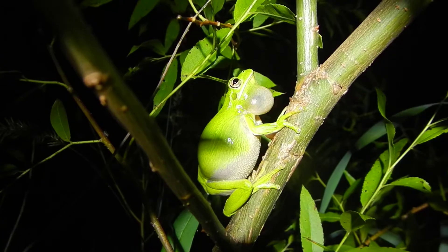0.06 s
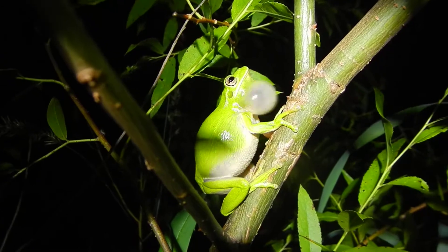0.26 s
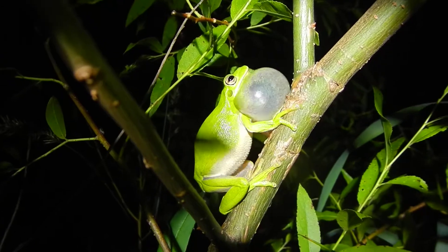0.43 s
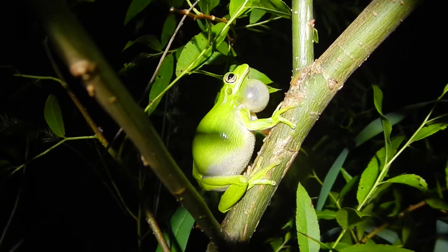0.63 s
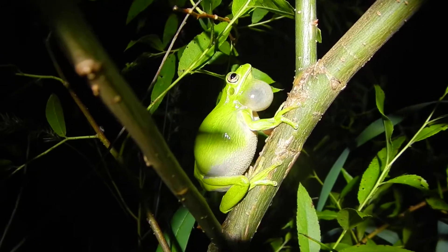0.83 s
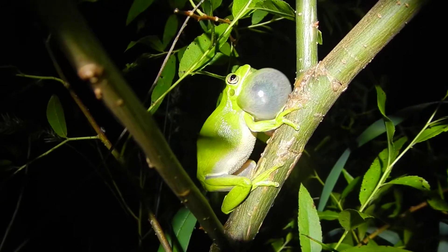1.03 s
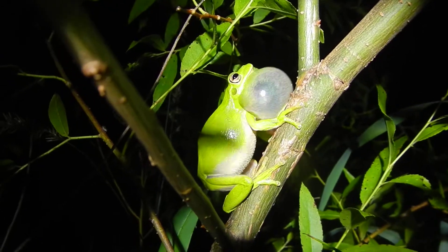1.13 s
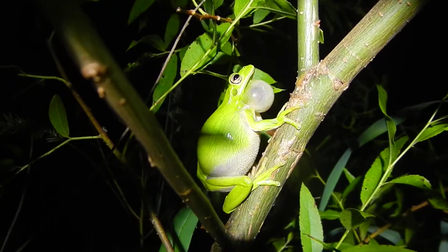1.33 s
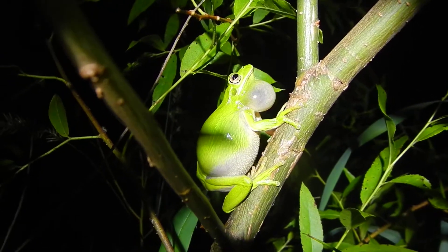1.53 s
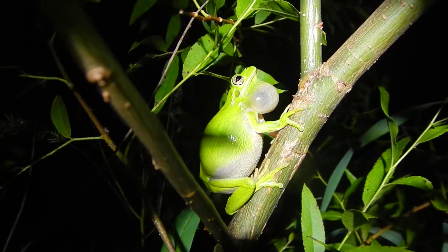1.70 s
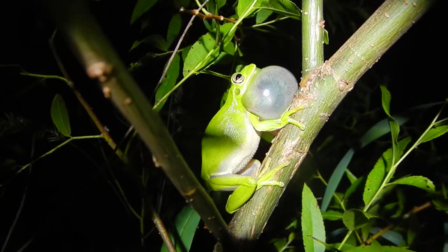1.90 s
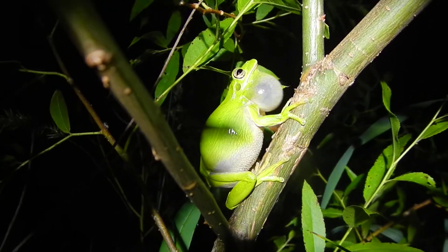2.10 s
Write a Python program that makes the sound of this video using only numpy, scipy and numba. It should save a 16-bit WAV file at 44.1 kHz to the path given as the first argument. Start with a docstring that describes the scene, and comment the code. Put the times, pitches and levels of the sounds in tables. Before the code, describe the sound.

A tree frog on a nearby branch gives three loud, short, nasal croaks at fairly even intervals. Between them, fainter frogs answer from farther off over a low rattling chorus in a wetland at night.

```python
"""A wetland at night, with a distant chorus of rattling frogs.
At 0.25 s a tree frog croaks from a branch close by: a few pops, an even pulse train through
the throat and the swelling vocal sac, then slackening pulses and a falling squeak.
The background dips at each near croak and creeps back, like a recorder's automatic gain.
From 0.46 s other tree frogs answer from farther off; the near one croaks again at 0.92 and 1.76 s."""
import sys
import numpy as np
from scipy import signal
from scipy.fft import rfft, irfft, next_fast_len
from scipy.io import wavfile
from scipy.ndimage import uniform_filter1d, minimum_filter1d
from numba import njit

SR = 44100
rng = np.random.default_rng(int(sys.argv[2]) if len(sys.argv) > 2 else 0)


def int16_out(signal):
    """Quantize to a 16-bit WAV file."""
    q = np.round(np.clip(np.atleast_2d(signal).T, -1, 1) * 32767)
    wavfile.write(sys.argv[1], SR, q.astype(np.int16))


N = 94815
TIME = np.arange(N) / SR

# near croaks: main_pop_s, slack_after_s, level_db, pitch_hz, lead_in_db
NEAR_CROAKS = [(0.2485, 0.12, -3, 271.4, -1.5), (.9185, 0.12, -3.4, 271.7, -23.5),
               (1.7591, 0.12, -4.26, 271.2, -20.5)]


def near_frog():
    """Pops, pulse train, slack pulses and squeak, all through the same throat."""
    # opening pops: after_main_pop_s, level_db
    opening_pops = [(0, 0.5), (0.0127, -3.5), (0.0187, 6.5)]
    # voice colour: freq_hz, gain_db
    near_eq = [(100, -9.5), (270, -11.5), (520, -16), (760, -2.5), (1100, 14), (1700, 4.5), (2900, 2),
               (3500, -5), (4300, -10), (5200, -4), (5900, -10), (7100, -18.5), (8200, -34.5), (9200, -26),
               (10300, -28.5), (13300, -31.5), (16000, -33)]
    # direction: freq_hz, left_minus_right_db
    balance = [(800, -2.1), (1500, 0), (2800, -4), (4500, -1.5), (6000, -8), (9000, 4.5)]
    lead_in_s, squeak_after_s, rasp_db, scatter_db = .0105, .023, -38, -28
    voice = 0
    for start_s, slack_after_s, level_db, pitch_hz, lead_in_db in NEAR_CROAKS:
        slack_s = start_s + slack_after_s
        train = pulse_train(start_s, slack_after_s, pitch_hz)
        soft = squeak(slack_s + squeak_after_s) + pop(start_s - lead_in_s, lead_in_db)
        soft += sum(pop(start_s + after_s, db) for after_s, db in opening_pops)
        source = train + slack(slack_s) + lowpass(soft, 4300)
        rasp_envelope = signal.lfilter([1], [1, -.96], np.abs(source) + 1e-18)
        source += from_db(rasp_db) * rasp_envelope * rng.standard_normal(N)
        croak = throat(source, start_s, low_hz=764, low_db=20.5, sac_hz=3010)
        voice += from_db(level_db) * (croak + overtones(source, start_s))
    voice = colour(voice, near_eq)
    ears = np.array([colour(voice, [(hz, side * db / 2) for hz, db in balance]) for side in (1, -1)])
    return ears + from_db(scatter_db) * foliage(voice)


def pop(end_s, peak_db, swing_hz=902.5, growth_db=3):
    """Four growing swings of the cords that stop at once."""
    swings_left = np.arange(4)
    times_s = end_s - swings_left / swing_hz * rng.uniform(.84, 1.08)
    return pulses(times_s, peak_db - growth_db * swings_left)


def pulse_train(main_pop_s, slack_after_s, pitch_hz):
    """The cords beat evenly, starting a little sharp and settling on pitch."""
    # pulse strength: after_main_pop_s, level_db
    effort = [(.026, 3.5), (.045, 0.5), (.1, -0.5), (.125, -2.5)]
    delay_s, sharp_hz, settle_s, jitter_periods = .0262, 9, .03, .003
    rate_hz = pitch_hz + sharp_hz * np.exp(-TIME / settle_s)
    times_s = cycle_times(main_pop_s + delay_s, slack_after_s - delay_s - .5 / pitch_hz, rate_hz)
    times_s += jitter_periods / pitch_hz * rng.standard_normal(N)[:len(times_s)]
    return pulses(times_s, curve(effort, times_s - main_pop_s))


def slack(start_s, count=5, rate_hz=200.9, loss_db=3, pair_gap_s=.001004):
    """As the pressure drops the pulses come slower, in fading weak-strong pairs."""
    pair = np.arange(count)
    times_s = start_s + pair / rate_hz + rng.normal(0, .00008, count)
    level_db = -1.5 - loss_db * pair + rng.normal(0, 1, count)
    return pulses(times_s, level_db - 3.5) + pulses(times_s + pair_gap_s, level_db)


def squeak(start_s, length_s=.023, top_hz=857, fall_hz=340, fade_db=29.5):
    """The cords ring on freely, falling in pitch as they fade."""
    pitch_hz = top_hz - fall_hz * np.minimum(TIME / length_s, 1) ** 2
    times_s = cycle_times(start_s, length_s, pitch_hz)
    return pulses(times_s, -10 - fade_db * (times_s - start_s) / length_s)


def throat(source, start_s, low_hz, low_db, sac_hz):
    """A fixed low resonance and two upper ones that rise as the vocal sac fills."""
    rise_hz, rise_s, mid_ratio = 900, .043, .76
    age_s = np.maximum(TIME - start_s, 0)
    upper_hz = sac_hz - rise_hz * np.exp(-age_s / rise_s)
    small_sac_db = 9.5 * np.exp(-age_s / .044)
    low = resonate(source * from_db(low_db + small_sac_db), low_hz, width_hz=100)
    mid = from_db(11) * glide(source, mid_ratio * upper_hz, width_hz=340)
    sac = from_db(26) * glide(source, upper_hz, width_hz=250)
    return low + mid + sac


def overtones(source, start_s, flicker_db=4, waver_ratio=.025):
    """High throat resonances ring between the pulses, drifting and wavering."""
    # throat modes: start_hz, glide_hz_per_s, width_hz, level_db
    modes = [(3710, -17.5, 600, 10), (4480, -1000, 120, 12), (5634, 1488, 190, 14), (6704, 1003, 290, 11.5),
             (7970, -1500, 160, 17), (9150, -3000, 87, 11), (12046, -9000, 300, 8),
             (14090, -16000, 440, 7.5)]
    age_s = np.clip(TIME - start_s, 0, .2)
    ring = 0
    for start_hz, glide_hz_per_s, width_hz, level_db in modes:
        gain = from_db(level_db + flicker_db * wander())
        centre_hz = (start_hz + glide_hz_per_s * age_s) * (1 + waver_ratio * wander())
        ring += gain * glide(source, centre_hz, width_hz)
    return ring


def thumps(decay_s=.027, cutoff_hz=265):
    """A faint dull thump under the opening pops, stronger with a louder lead-in."""
    envelope = sum(from_db(.5 * lead_in_db) * (TIME > start_s) * np.exp(-np.abs(TIME - start_s) / decay_s)
                   for start_s, *_, lead_in_db in NEAR_CROAKS)
    return from_db(-34.5) * envelope * rms_one(lowpass(wide_noise(), cutoff_hz))


def far_frogs():
    """Answering croaks: soft-edged pulse trains through the throat, scattered by foliage."""
    # answers: start_s, length_s, pitch_hz, level_db, low_hz, sac_hz, roughness (0-1)
    answers = [(.46, 0.18, 286, -29, 960, 3390, 0.07), (0.671, 0.18, 193, -25, 1016, 3180, 0.1),
               (1.125, .165, 281.1, -33, 950, 3100, 0.03), (1.305, 0.19, 286.8, -29.5, 950, 3390, .06),
               (1.59, 0.18, 277, -35, 820, 2987, 0.13), (1.944, 0.1806, 195.5, -29.5, 1040, 3210, .15),
               (1.97, 0.19, 285.3, -37, 830, 3060, 0.08)]
    # voice colour: freq_hz, gain_db
    far_eq = [(300, -21), (650, -23.5), (880, -3.5), (1800, 0.5), (3000, -2.5), (4000, -11), (5000, -8.5),
              (6200, -19.5), (7400, -3.5), (8600, -27.5), (11000, -36), (16000, -54)]
    attack_s, release_s, sag_ratio, scatter_db = .0503, .047, .0219, -7
    voice = 0
    for start_s, length_s, pitch_hz, level_db, low_hz, sac_hz, roughness in answers:
        rate_hz = pitch_hz * (1 + sag_ratio * np.exp(-2 * TIME / length_s))
        times_s = cycle_times(start_s, length_s, rate_hz)
        jitter, shimmer = roughness * rng.standard_normal((200, 2))[:len(times_s)].T
        source = pulses(times_s + .12 / pitch_hz * jitter, level_db + 10 * shimmer)
        attack = np.clip((TIME - start_s) / attack_s, 0, 1)
        release = np.clip((start_s + length_s - TIME) / release_s, 0, 1)
        voice += throat(source * attack * release, start_s, low_hz, low_db=22, sac_hz=sac_hz)
    voice = colour(voice, far_eq)
    return voice + from_db(scatter_db) * foliage(voice)


def chorus(whine_hz=14835):
    """Rattles, ticks and a thin whine over a blur of frogs, ducked at each near croak."""
    # blur of the farthest frogs and night air: freq_hz, gain_db
    murmur_eq = [(25, -33), (60, -14), (88, -8), (140, -13), (300, -16), (750, -17), (1000, -9.5),
                 (1350, 2), (1850, -18), (2500, 4), (3300, -17), (4100, -6), (5200, -31), (8000, -34),
                 (11000, -36.5), (16000, -54.5)]
    # dips and slow recoveries, like a recorder's automatic gain: time_s, gain_db
    gain_ducking = [(0, -4), (.23, 0.5), (.42, -20), (.5, -13.5), (.66, -12), (.89, -9), (1.1, -16.5),
                    (1.25, -12), (1.5, -8.5), (1.73, -4), (1.94, -19), (2.04, -11), (2.15, -19)]
    murmur = from_db(-41) * rms_one(colour(wide_noise(), murmur_eq))
    whine = from_db(-68.5) * np.sin(2 * np.pi * whine_hz * TIME)
    return (murmur + rattles() + ticks() + whine) * from_db(curve(gain_ducking, TIME))


def rattles(sharpness=2.4):
    """Distant rattling frogs: evenly pulsed bands of noise."""
    # calls: first_pulse_s, end_s, rate_hz, centre_hz, width_hz, level_db
    calls = [(0.0187, 0.52, 49, 2514, 130, -38.5), (.015, 0.55, 40, 1337, 250, -44.5),
             (0.18, 1.5, 31, 2800, 880, -45.5), (0.4, 1.7, 71, 1340, 210, -45)]
    out = 0
    for first_s, end_s, rate_hz, centre_hz, width_hz, level_db in calls:
        gate = rms_one(np.exp(sharpness * np.cos(2 * np.pi * rate_hz * (TIME - first_s))))
        band = resonate(resonate(wide_noise(), centre_hz, width_hz), centre_hz, width_hz)
        running_rms = np.sqrt(uniform_filter1d(np.mean(band ** 2, axis=0), size=300) + 1e-20)
        calling = (TIME > first_s - .5 / rate_hz) * (TIME < end_s)
        out += from_db(level_db) * gate * calling * band / running_rms
    return out


def ticks(mean_per_s=30, centre_hz=3970, width_hz=310):
    """Random ringing ticks, scattered by foliage."""
    clicks = (rng.random(N) < mean_per_s / SR) * from_db(rng.normal(0, 5.9, N))
    ring = resonate(resonate(clicks, centre_hz, width_hz), centre_hz, width_hz)
    return from_db(-47) * rms_one(ring + 1.2 * foliage(ring))


def drone():
    """A faint steady low drone."""
    return from_db(-76.5) * rms_one(resonate(wide_noise(), centre_hz=84, width_hz=19))


def foliage(x, t60_s=.09):
    """Short diffuse scatter from leaves and water, different in each ear."""
    time_s = TIME[:SR // 4]
    tail = rng.standard_normal((2, len(time_s))) * from_db(-60 * time_s / t60_s) * (time_s > .002)
    return signal.fftconvolve(x[None], tail / np.sqrt(np.sum(tail[0] ** 2)), axes=1)[:, :N]


def cycle_times(start_s, length_s, rate_hz):
    """Pulse times of an oscillator; rate_hz runs from its start."""
    cycles = np.cumsum(rate_hz) / SR
    count = int(np.interp(length_s, TIME, cycles)) + 1
    return start_s + np.interp(np.arange(count), cycles, TIME)


def pulses(times_s, level_db):
    """Windowed-sinc pulses placed between samples."""
    out, position = np.zeros(N), times_s[:, None] * SR
    taps = np.floor(position).astype(int) + np.arange(-7, 9)
    offset = taps - position
    shape = np.sinc(offset) * np.sinc(offset / 8)
    np.add.at(out, np.clip(taps, 0, N - 1), shape * from_db(level_db)[:, None])
    return out


def resonate(x, centre_hz, width_hz):
    """Fixed resonance, unit peak gain."""
    radius = np.exp(-np.pi * width_hz / SR)
    zeros = np.array([1, 0, -1]) * (1 - radius ** 2) / 2
    poles = [1, -2 * radius * np.cos(2 * np.pi * centre_hz / SR), radius ** 2]
    denormal_guard = 1e-18 * (-1) ** (np.arange(N) // 2)
    return signal.lfilter(zeros, poles, x + denormal_guard)


@njit
def glide(x, centre_hz, width_hz):
    """Resonance with a moving centre."""
    radius = np.exp(-np.pi * width_hz / SR)
    out, state = np.zeros(len(x)), 0j
    for i in range(len(x)):
        state = state * radius * np.exp(2j * np.pi * centre_hz[i] / SR) + x[i] + 1e-18
        out[i] = (1 - radius) * (2 * state.real - x[i])
    return out


def colour(x, eq):
    """Minimum-phase filter through rows of freq_hz, gain_db."""
    size = 2 * next_fast_len(N // 2 + 4096)
    freq_hz, gain_db = np.transpose(eq)
    bin_hz = np.arange(size // 2 + 1) * SR / size
    bin_db = np.interp(np.log(bin_hz + 1), np.log(freq_hz), gain_db)
    cepstrum = irfft(np.log(from_db(bin_db)))
    cepstrum[1:size // 2] *= 2
    cepstrum[size // 2 + 1:] = 0
    return irfft(rfft(x, size) * np.exp(rfft(cepstrum)))[..., :N]


def lowpass(x, cutoff_hz):
    """Two-pole low-pass."""
    return signal.sosfilt(signal.butter(2, cutoff_hz, fs=SR, output="sos"), x + 1e-18)


def wide_noise(side_gain=.38):
    """Stereo noise, partly alike in both ears."""
    mid, side = rng.standard_normal((2, N))
    return mid + side_gain * side * np.array([[1], [-1]])


def wander(step_s=.03):
    """Straight lines between random values."""
    knots_s = np.arange(0, TIME[-1] + step_s, step_s)
    return np.interp(TIME, knots_s, rng.standard_normal(len(knots_s)))


def curve(rows, time_s):
    """Straight lines through a table."""
    return np.interp(time_s, *np.transpose(rows))


def from_db(db):
    """Decibels to gain."""
    return 10 ** (np.asarray(db) / 20)


def rms_one(x):
    """Scale to unit rms."""
    return x / np.sqrt(np.mean(x ** 2) + 1e-20)


def scene():
    """The near frog in front of its neighbours and the chorus."""
    return near_frog() + thumps() + far_frogs() + chorus() + drone()


def record(dry):
    """Quick peak limiter, then a steep treble cut."""
    ceiling, window_samples, cutoff_hz = .88, 161, 16200
    gain = np.minimum(1, ceiling / (np.abs(dry).max(axis=0) + 1e-9))
    gain = uniform_filter1d(minimum_filter1d(gain, window_samples), window_samples)
    return signal.sosfilt(signal.ellip(10, .1, 80, cutoff_hz, fs=SR, output="sos"), dry * gain)


dry = scene()
out = record(dry)
int16_out(out)
```